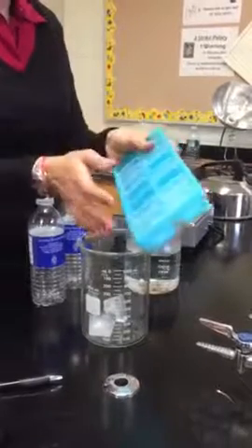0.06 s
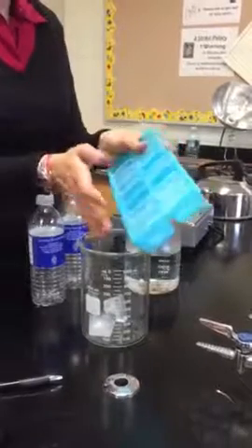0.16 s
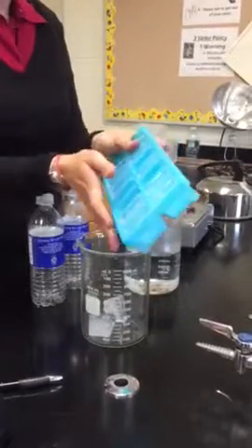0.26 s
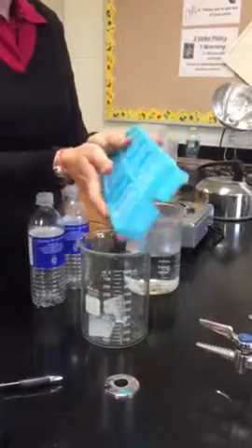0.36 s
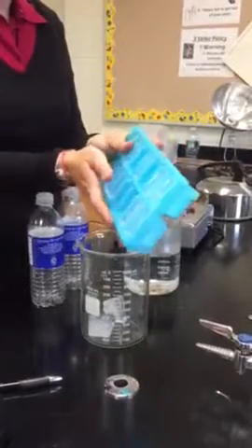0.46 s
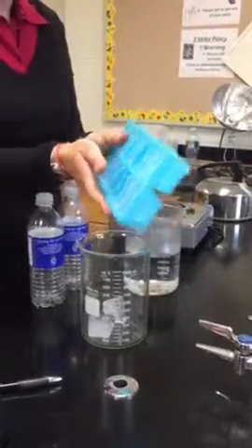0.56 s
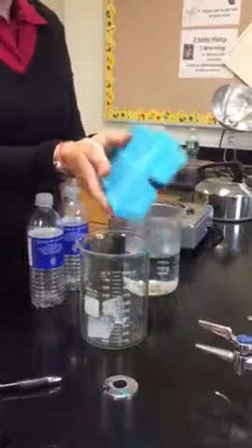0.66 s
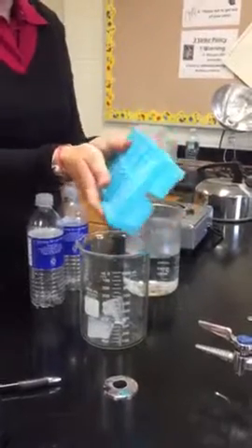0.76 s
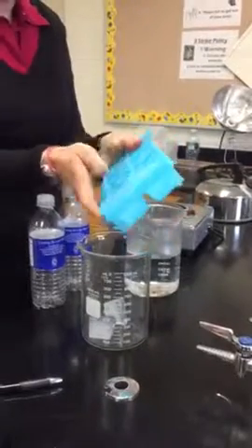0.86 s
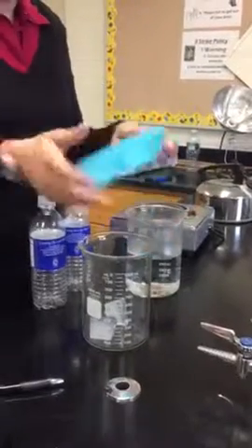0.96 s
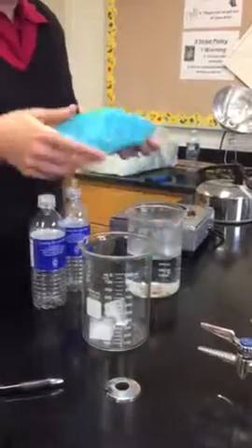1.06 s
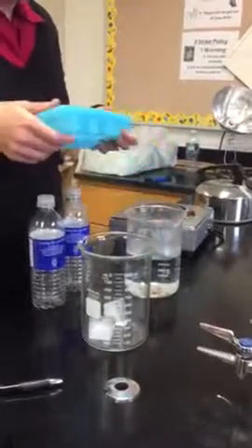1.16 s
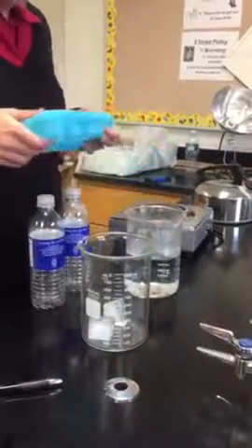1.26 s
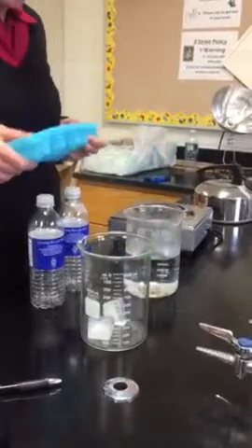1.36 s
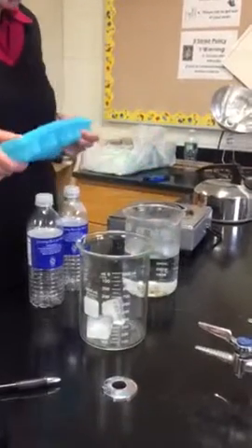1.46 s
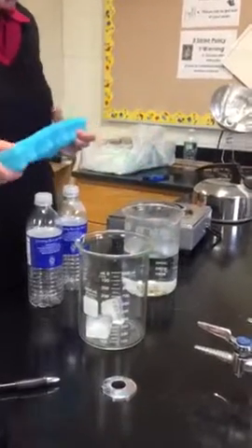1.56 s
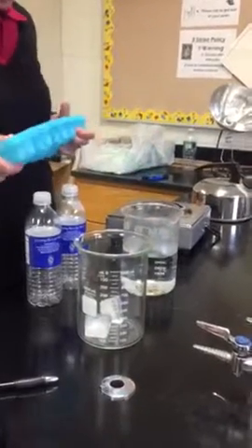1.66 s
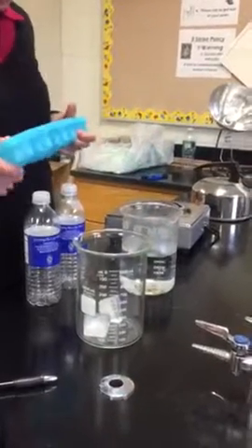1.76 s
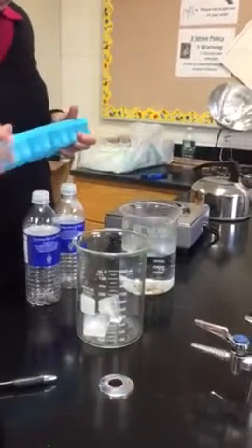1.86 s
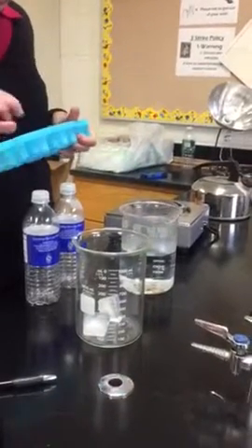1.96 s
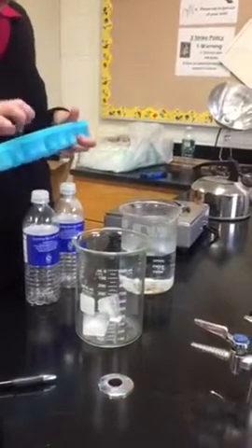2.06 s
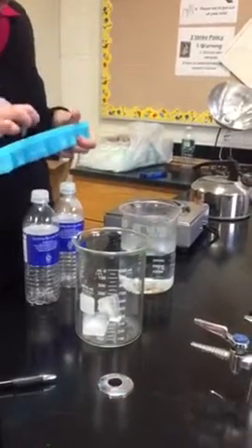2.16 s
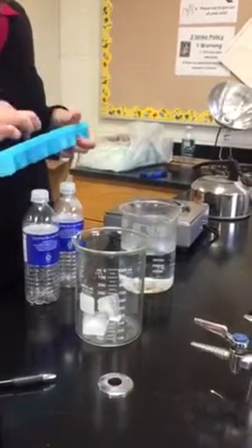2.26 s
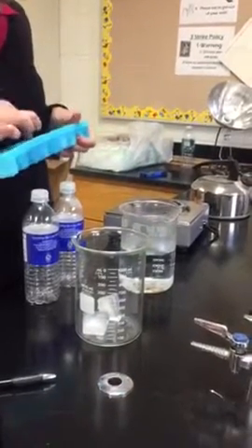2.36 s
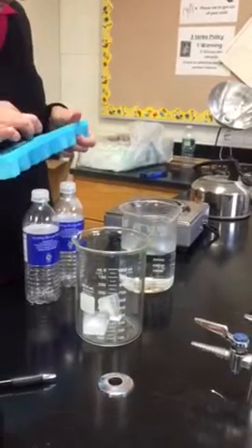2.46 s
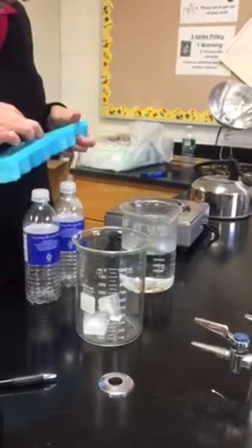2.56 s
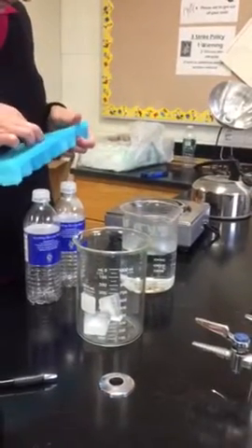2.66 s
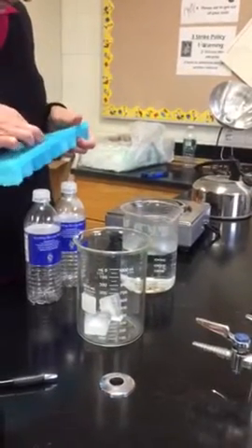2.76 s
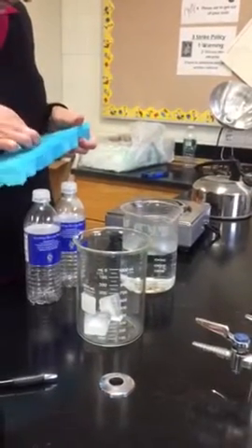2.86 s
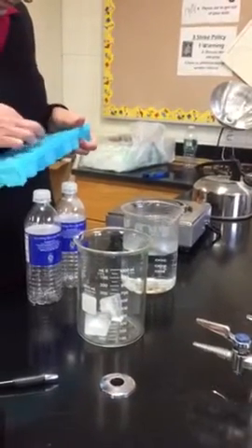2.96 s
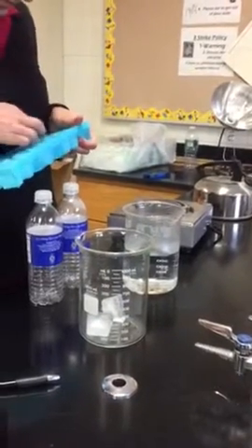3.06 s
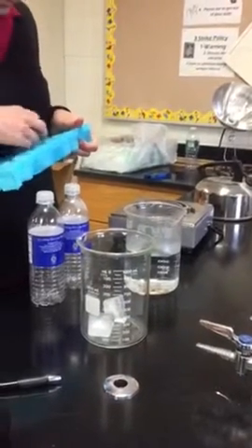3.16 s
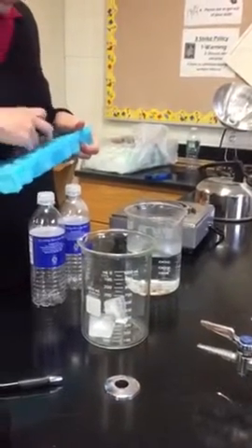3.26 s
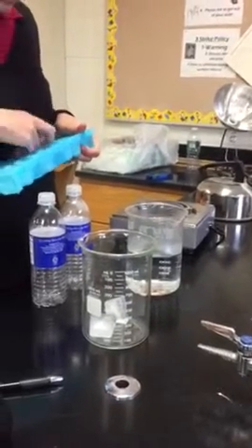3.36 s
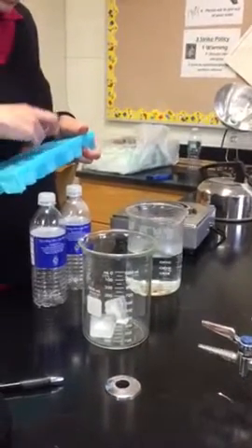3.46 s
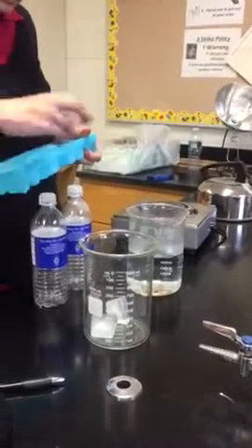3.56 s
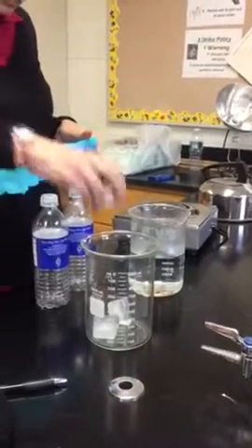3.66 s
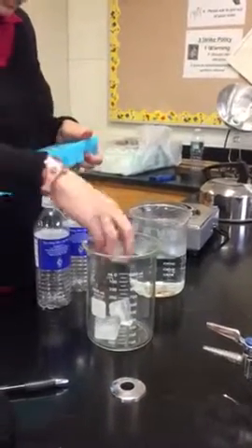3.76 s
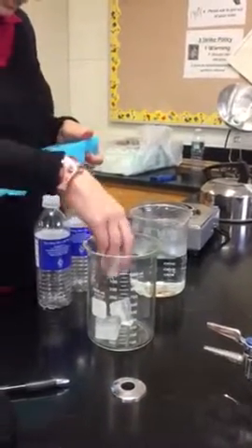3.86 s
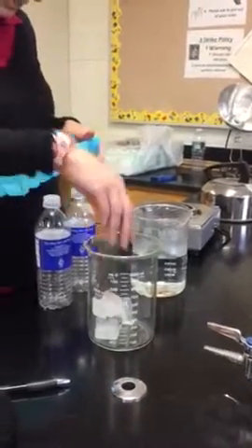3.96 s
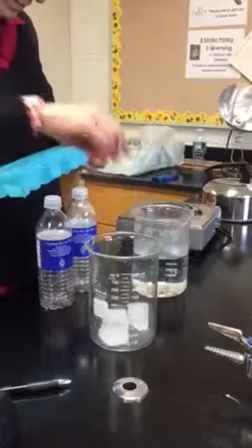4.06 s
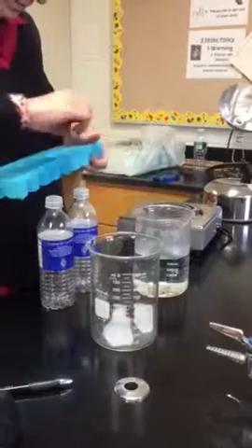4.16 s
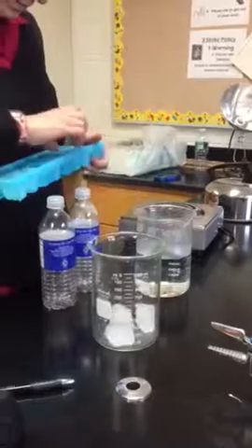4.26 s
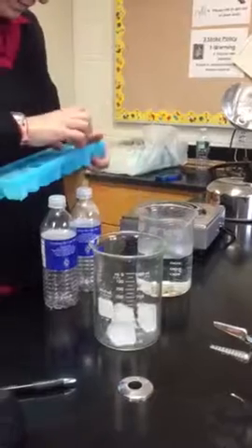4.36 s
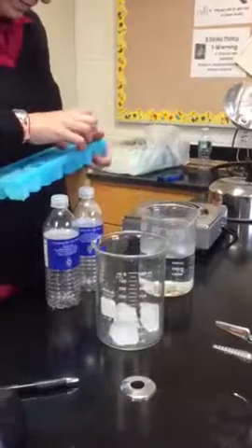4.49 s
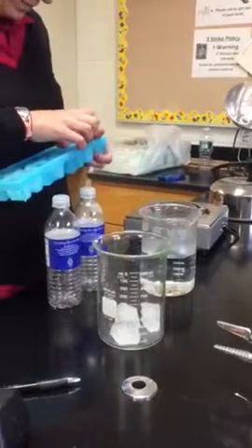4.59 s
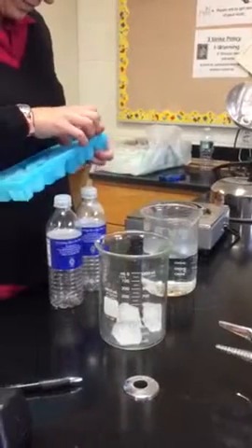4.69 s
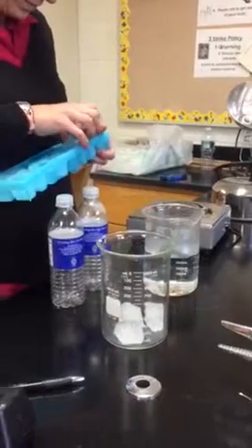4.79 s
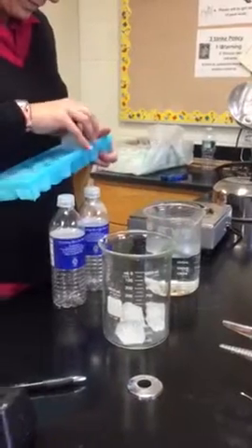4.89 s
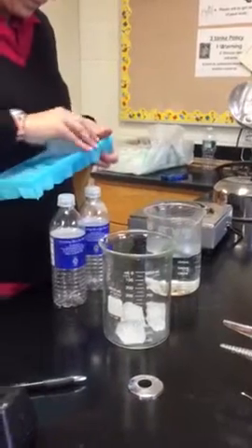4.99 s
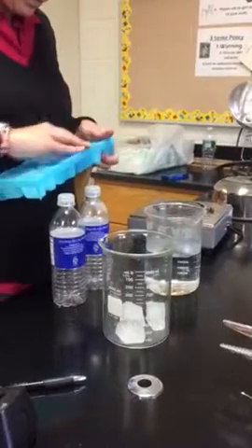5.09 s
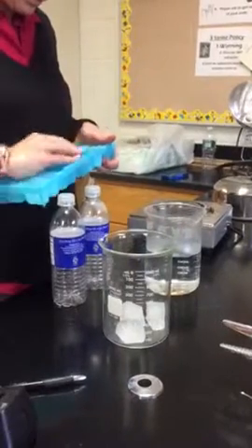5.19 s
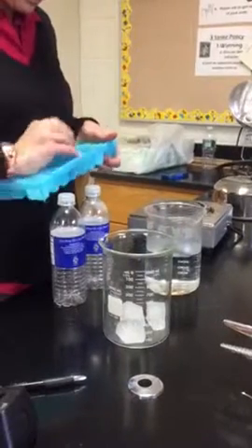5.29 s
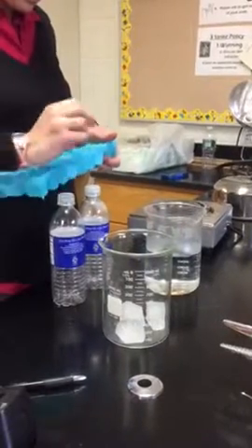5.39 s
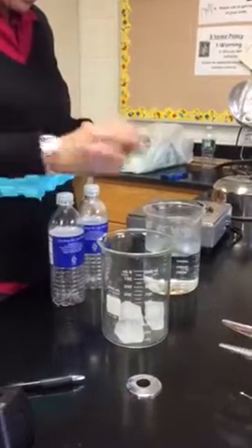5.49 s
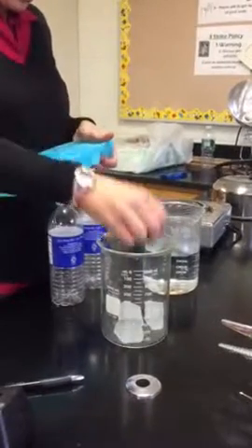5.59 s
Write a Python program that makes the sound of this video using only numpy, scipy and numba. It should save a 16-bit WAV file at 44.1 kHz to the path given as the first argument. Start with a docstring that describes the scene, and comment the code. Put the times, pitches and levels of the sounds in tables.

```python
"""A plastic ice tray is twisted and picked at by hand: it creaks, rubs, squeaks and snaps as cubes come loose.
Random stick-slip clicks make the creaks, rubs and squeaks; noise bursts and ringing modes make the snaps.
A handful of cubes drops into a glass beaker and bounces: decaying sines ring its wall and base, with noisy ice.
A hard-walled room, built from decaying bands of noise, answers snaps, short rubs, squeaks and glass.
Filtered noise makes the ventilation that rumbles and hums underneath."""
import sys
import numpy as np
from scipy import signal
from scipy.fft import rfft, irfft
from scipy.io import wavfile
from numba import njit

SR = 44100
rng = np.random.default_rng(int(sys.argv[2]) if len(sys.argv) > 2 else 0)


def master(y):
    """Save y as 16-bit WAV."""
    cut = np.clip(np.atleast_2d(y).T, -1, 1)
    pcm = np.round(cut * 32767)  # scale
    wavfile.write(sys.argv[1], SR, pcm.astype(np.int16))


N = 248283

# Colour of ice breaking free. Each row: frequency in Hz, filter gain in dB.
CRACK_COLOUR = [(1060, -43.5), (1800, -9), (2060, -7.5), (2460, -8.5), (4860, -9), (6140, -10),
                (15300, -19.5)]


def amp(db):
    """Decibels to gain."""
    return 10 ** (np.asarray(db) / 20)


def rms_one(x):
    """Scaled to rms 1."""
    return x / np.sqrt(np.mean(x ** 2) + 1e-20)


def filtered(x, order, hz, kind):
    """Butterworth filter: "high" or "low" with one corner in Hz, "band" with two."""
    return signal.sosfilt(signal.butter(order, hz, kind, fs=SR, output="sos"), x)


def at_hz(points, hz):
    """A curve of (Hz, value) points read on a log-frequency axis."""
    point_hz, value = np.array(points).T
    return np.interp(np.log(hz), np.log(point_hz), value)


def colour(x, spectrum):
    """Causal (minimum-phase) filter with the given spectrum, by folding its cepstrum."""
    hz = np.maximum(np.fft.rfftfreq(4096, 1 / SR), 1)
    cepstrum = irfft(np.log(amp(at_hz(spectrum, hz))))
    cepstrum[1:2048] *= 2
    cepstrum[2049:] = 0
    impulse = irfft(np.exp(rfft(cepstrum)))
    return signal.oaconvolve(x, impulse)[:len(x)]


def ring(clicks, hz, t60):
    """A two-pole resonance: a unit click starts a sine of height 1 that falls 60 dB in t60 seconds."""
    r = amp(-60 / (t60 * SR))
    w = 2 * np.pi * hz / SR
    return signal.lfilter([0, np.sin(w)], [1, -2 * r * np.cos(w), r * r], clicks + 1e-18)


@njit
def glide(x, hz, r, rate):
    """A two-pole resonance whose centre may move; pole radius r sets its width."""
    out = np.zeros(len(x))
    for i in range(2, len(x)):
        feedback = 2 * r * np.cos(2 * np.pi * hz[i] / rate) * out[i - 1] - r * r * out[i - 2]
        out[i] = x[i] - x[i - 2] + feedback
    return out


def clicks_at(times, sizes):
    """A click of each size at each time."""
    out = np.zeros(N)
    out[np.round(np.asarray(times) * SR).astype(int)] = sizes
    return out


def bursts(times, sizes, t60):
    """Noise that starts at once and dies away after each click."""
    r = amp(-60 / (t60 * SR))
    envelope = signal.lfilter([1], [1, -r], clicks_at(times, sizes) + 1e-18)
    return envelope * rng.standard_normal(N)


def grains(per_s, spread_db):
    """Random clicks of uneven size and either sign; rms 1."""
    size_db = spread_db * np.minimum(rng.exponential(1, N), 4)
    sizes = amp(size_db) * rng.choice([-1, 1], N)
    return rms_one(sizes * (rng.random(N) < per_s / SR))


def snaps():
    """A cube lets go and rebounds: each time a broad crack, and a jolt that rings the tray."""
    # Tray snaps. Each row: start in seconds, jolt of the body in dB, crack in dB.
    first_snaps = [(0.781, -83, -46), (0.798, -82, -49), (0.999, -54.5, -38), (1.302, -83, -27),
                   (1.355, -49, -24), (1.418, -69.5, -40.5), (1.465, -42, -24.5), (1.49, -41.5, -16.5),
                   (1.508, -43.5, -21), (1.539, -66, -25), (1.569, -53.5, -33.5), (1.589, -14.5, -2),
                   (1.633, -58, -18.5), (1.689, -50, -37), (1.775, -49, -32), (2.62, -64.5, -29.5),
                   (2.816, -81, -20.5), (2.915, -54, -22.5), (2.925, -31, -3.5), (3.064, -38, -59),
                   (3.108, -57, -27.5), (3.215, -47, -62), (3.239, -55, -60), (3.287, -40, -49),
                   (3.325, -48.5, -60), (3.479, -47, -41.5), (3.529, -75, -52), (4.739, -89.5, -34),
                   (4.79, -43, -36), (4.931, -47, -38.5), (5.025, -33, -30), (5.044, -46, -18),
                   (5.064, -27.5, -40), (5.081, -12.5, -12.5), (5.092, -14, -33), (5.147, -19.5, -8.5),
                   (5.184, -35, -19.5), (5.383, -66, -34)]
    # The freed cube knocks about in its cell.
    # Each row: delay in seconds, change of the jolt in dB, change of the crack in dB.
    rebounds = [(.008, -14.5, -24.5), (.015, -11.5, -17)]
    rows = np.array(first_snaps)
    s, jolt_db, crack_db = np.vstack([rows] + [rows + rebound for rebound in rebounds]).T
    jolt = tray_body(clicks_at(s, amp(jolt_db)) + bursts(s, amp(jolt_db - 15), t60=0.014))
    crack = colour(bursts(s, amp(crack_db), t60=0.018), CRACK_COLOUR)
    return jolt + crack


def tray_body(x):
    """The hollow tray rings briefly in a few broad modes."""
    # Each row: frequency in Hz, width in Hz before the widening below, level in dB.
    body_modes = [(436, 89, -19), (927, 130, -6.5), (1184, 64, -6.5), (1870, 330, 1.5), (2960, 29, -18),
                  (3590, 110, -14), (4440, 48, -21.5), (6500, 380, -11.5)]
    widening_hz = 90
    rings = 0
    for k, (hz, width_hz, db) in enumerate(body_modes):
        sign = (-1) ** k
        rings = rings + sign * amp(db) * ring(x, hz, 2.31 / (width_hz + widening_hz))
    return filtered(rings, 2, 380, "high")   # too small for low notes


def handling():
    """Stick-slip grains: through the tray they creak, on the ice they crackle and hiss."""
    # Hands working the tray, one row a squeeze. Each row: start in seconds, hold in seconds,
    # creak of the body in dB, rubbing in dB, pitch of the bent cell in Hz.
    squeezes = [(0.70, 0.03, -93, -71.5, 1280), (0.913, 0.023, -90, -62, 1640),
                (1.18, 0.055, -67.5, -64.5, 1970), (1.329, 0.043, -64.5, -54.5, 1220),
                (1.424, 0.079, -56.5, -54.5, 1340), (1.591, 0.06, -58, -53, 1100),
                (1.709, 0.092, -63, -54.5, 1110), (2.62, 0.045, -67, -64.5, 1940),
                (2.858, 0.033, -56.5, -44, 1840), (2.963, 0.081, -56.5, -55, 1750),
                (3.091, 0.056, -58, -65, 1640), (3.206, 0.083, -58, -80, 1730),
                (3.365, 0.053, -73.5, -87, 1800), (3.48, .06, -78, -73, 1660), (4.712, .03, -71, -72, 1920),
                (4.774, 0.012, -59.5, -80, 1450), (4.911, 0.074, -63.5, -61.5, 2048),
                (5.077, 0.028, -34, -61, 1950), (5.168, 0.05, -45.5, -79, 1723),
                (5.301, 0.093, -64, -63, 1620)]
    rise_db_per_s, fall_db_per_s = 404.5, 236.5
    cell_width_hz = 380
    t = np.arange(N) / SR
    creaking, rubbing = np.zeros(N), np.zeros(N)
    for start, hold, creak_db, rub_db, _ in squeezes:
        rise_db = rise_db_per_s * (t - start)
        fall_db = fall_db_per_s * (start + hold - t)
        shape = amp(np.minimum(0, np.minimum(rise_db, fall_db)))
        creaking += amp(creak_db) * shape
        rubbing += amp(rub_db) * shape

    start, hold, *_, pitch = np.transpose(squeezes)
    cell_hz = np.interp(t, start + hold / 2, pitch)
    slips = grains(per_s=1300, spread_db=4.0)
    # the bent cell rings near its own pitch
    cell = rms_one(glide(slips, cell_hz, np.exp(-np.pi * cell_width_hz / SR), SR))
    creak = creaking * rms_one(cell + .8 * rms_one(tray_body(slips)))
    rub = rubbing * rms_one(colour(grains(per_s=3000, spread_db=3.0), CRACK_COLOUR))
    return creak + rub


def rubs_and_squeaks():
    """Short rubs and squeaks: dense slips through a resonance, broad or narrow, whose pitch may glide."""
    # Rubs, creaks and squeaks of the tray. Each row: start in seconds, end in seconds, first pitch in Hz,
    # last pitch in Hz, width of one resonance pass in Hz, level ahead of the fades in dB.
    rub_rows = [(0.694, .735, 4950, 4950, 8000, -74.5), (0.896, .96, 6760, 6170, 14000, -60),
                (1.707, 1.754, 1680, 940, 900, -49), (2.806, 2.834, 1500, 1600, 1200, -48.5),
                (2.917, 2.943, 1300, 1770, 900, -37), (2.85, 2.908, 1290, 2160, 495, -45),
                (3.093, 3.159, 1330, 1510, 1080, -45.5), (3.195, 3.238, 1780, 1760, 350, -48),
                (4.928, 4.975, 2150, 2240, 250, -59), (4.931, 4.976, 4530, 4370, 600, -57),
                (5.086, 5.118, 1700, 2100, 790, -27), (5.331, 5.403, 1810, 1614, 261, -45)]
    out = np.zeros(N)
    slips = grains(per_s=5000, spread_db=3.5)
    for start, end, first_hz, last_hz, width_hz, db in rub_rows:
        a, b = round(start * SR), round(end * SR)
        hz = np.linspace(first_hz, last_hz, b - a)
        r = np.exp(-np.pi * width_hz / SR)
        resonant = glide(glide(slips[a:b], hz, r, SR), hz, r, SR)   # twice: steep flanks
        out[a:b] += amp(db) * rms_one(resonant) * signal.windows.tukey(b - a, .3)
    return out


def beaker():
    """Every cube strikes all modes, by where it lands; hardness tilts each blow brighter or duller."""
    # Cubes on glass. Each row: start in seconds, ring in dB ahead of the settling,
    # height of the blow (0 base to 1 rim), knock in dB, hardness in dB per octave.
    clinks = [(3.836, -51.5, 0.49, -42, 2), (4.030, -21, 0.93, -22.5, 2.5), (4.057, -20, .02, -4, 0.5),
              (4.061, -16.5, .75, 3, 2.5), (4.081, -17, .52, -10.5, 2), (4.111, -22, .01, -29, 4.5),
              (4.152, -34, 0.49, -19, 4.5), (4.166, -17, 0.013, -5.5, 0.9), (4.191, -11, 0.12, -8.5, 4),
              (4.245, -19, 0.24, -14.5, 3.5), (4.294, -29.5, 0.66, -13.5, 2),
              (4.308, -28.5, 0.21, -23, -4.5), (4.320, -44, 0.092, -32, -6), (4.342, -48, .15, -23.5, -6),
              (4.366, -29.5, 0.13, -25, -6.5), (4.392, -54, 0.12, -34, 1)]
    # Modes of the glass: close pairs beat, the thick base dies fast.
    # Each row: frequency in Hz, t60 in seconds ahead of the settling.
    glass_modes = [(830, .4), (1380, .03), (1962, .13), (2229, .8), (2860, .06), (3080, .055), (3180, .055),
                   (3600, .06), (3920, .25), (4097, .12), (4300, .14), (4698, .15), (4728, .2), (5160, .17),
                   (6125, .03), (6220, .045), (6335, .035), (7122, .12), (7709, .15), (9000, .045),
                   (9250, .07), (10137, .065), (10600, .05), (11935, .04), (12680, .05), (13100, .035),
                   (14210, .03), (14840, .03)]
    # How strongly each mode answers a blow on the rim, the side and the base: one level in dB a mode.
    on_rim = [0.5, -28, -23, 0.5, -32.5, -33.5, -38.5, -31, -9.5, -2, -18, -21, -8.5, -23.5, -32.5, -36,
              -19.5, -25.5, -31.5, -30.5, -25, -14, -20, -26.5, -27, -32, -32, -28]
    on_side = [-7.5, -24, -13, -36, -28, -27.5, -30, -25, -11, -20.5, -15.5, -5, -16, -15, -33, -39.5, -23,
               -15, -21.5, -29.5, -22, -10, -19, -18, -20, -29, -35, -33.5]
    on_base = [-20, -15.5, -33, -36.5, -7, 2, 7.5, -2.5, -40.5, -30.5, -27.5, -34.5, -30, -44, 1, 6, 0.5,
               -26.5, -34.5, -12, -28.5, -11.5, -20.5, -12, -28.5, -14, -14.5, -14]
    spill_db = 40.5   # a blow reaches other parts of the glass weaker, by this much over the whole height
    contact_t60_s = .005   # ice yields, so the ring swells over a millisecond
    settled_s, settled_t60_s = 4.3, .45   # cubes come to rest against the glass and damp it

    s, ring_db, height, knock_db, hardness = np.transpose(clinks)
    rim_db, side_db, base_db = (-spill_db * abs(height - part) for part in (1, .5, 0))
    chance_db = 1.5 * rng.normal(0, 1, (len(s), len(glass_modes)))
    out = np.zeros(N)
    live = slice(round((s[0] - .01) * SR), round((s[-1] + 1) * SR))
    for k, (hz, t60) in enumerate(glass_modes):
        share = amp(rim_db + on_rim[k]) + amp(side_db + on_side[k]) + amp(base_db + on_base[k])
        blow_db = ring_db + hardness * np.log2(hz / 3000) + chance_db[:, k]
        blows = clicks_at(s, share * amp(blow_db))[live]
        out[live] += ring(blows, hz, t60) - ring(blows, hz, contact_t60_s)
    since_settled = np.maximum(np.arange(N) / SR - settled_s, 0)
    out *= amp(-60 * since_settled / settled_t60_s)
    return out + ice(s, knock_db, hardness)


def ice(s, knock_db, hardness):
    """The cubes hardly ring: a dull knock, a crack as bright as the blow, and a short rattle among them."""
    knock = bursts(s, amp(knock_db + 0.5), t60=0.017)
    crack = bursts(s, amp(knock_db + 3.3 * hardness - 13.0), t60=0.027)
    rattle = bursts(s, amp(knock_db + 1.2 * hardness - 25.5), t60=0.2)
    dull = filtered(knock, 2, [330, 2200], "band")
    splinter = filtered(crack + rattle, 3, 9200, "high")   # thin edges chip
    crunch = filtered(crack + rattle, 2, [2300, 7600], "band")
    return dull + amp(-6.5) * splinter + crunch


def room(x):
    """Diffuse echoes: octave bands of noise that swell in about a millisecond, each dying at its own rate."""
    # Each row: frequency in Hz, t60 in seconds.
    decay_times = [(200, 1), (1000, 0.42), (4000, 0.66), (8000, 0.19), (15000, 0.29)]
    t = np.arange(SR) / SR
    tail = 0
    for low in 125 * 2. ** np.arange(7):
        band = filtered(rng.standard_normal(SR), 2, [low, 2 * low], "band")
        tail = tail + band * amp(-60 * t / at_hz(decay_times, 1.4 * low))
    tail = tail * (1 - np.exp(-t / 0.0009))
    return signal.oaconvolve(x, tail / np.sqrt(np.sum(tail ** 2)))[:N]


def ventilation():
    """Broad rumble and faint hiss, with noise caught in narrow bands as hum."""
    # Colour of the moving air. Each row: frequency in Hz, relative level in dB.
    air_colour = [(12, -69.5), (20, -32), (43, -11.5), (86, -6.5), (123, 2.5), (146, -9.5), (198, -7.5),
                  (388, -17), (459, -23.5), (678, -23), (1030, -30), (1290, -30), (4940, -40),
                  (14700, -48.5), (16000, -70)]
    # Wavering fan tones. Each row: frequency in Hz, approximate width in Hz, rms level in dB.
    fan_tones = [(120.2, 10, -57.5), (207, 30, -60)]
    air_db = -55
    air = colour(rng.standard_normal(N + 4096), air_colour)[4096:]   # filter run in first
    out = amp(air_db) * rms_one(air)
    for hz, width_hz, db in fan_tones:
        tone = ring(rng.standard_normal(N + SR), hz, 2.4 / width_hz)[SR:]
        out += amp(db) * rms_one(tone)
    return out


def scene():
    """Snaps, short rubs, squeaks and beaker sound in the room; handling and ventilation stay dry."""
    room_db = -13
    near = snaps() + rubs_and_squeaks() + beaker()
    near = filtered(near, 2, 260, "high")   # small things radiate no bass
    return (near + amp(room_db) * room(near) + handling() + ventilation())[None]


def record(dry):
    """Deep bass rolls off, peaks are rounded, the top is cut."""
    low_hz, edge_hz, cutoff_hz = 46, 15600, 16400
    dry = filtered(dry, 3, low_hz, "high")
    soft = .7 * np.tanh(dry / .7)
    soft = filtered(soft, 10, edge_hz, "low")
    return signal.sosfilt(signal.cheby2(12, 70, cutoff_hz, fs=SR, output="sos"), soft)


dry = scene()
out = record(dry)
master(out)
```